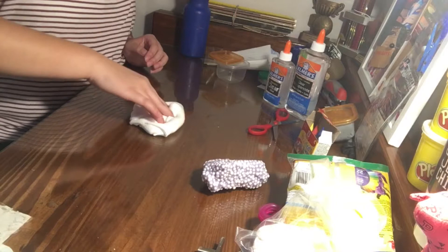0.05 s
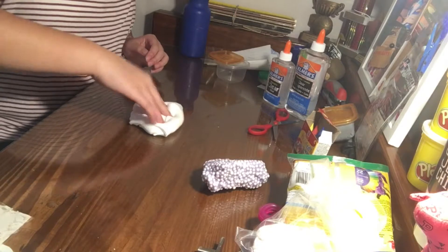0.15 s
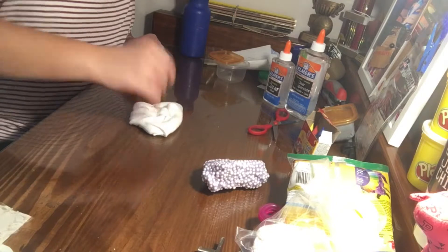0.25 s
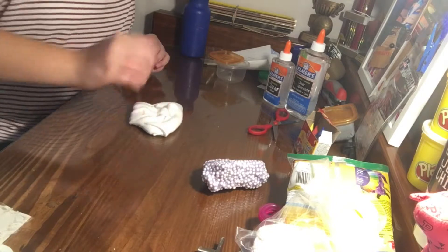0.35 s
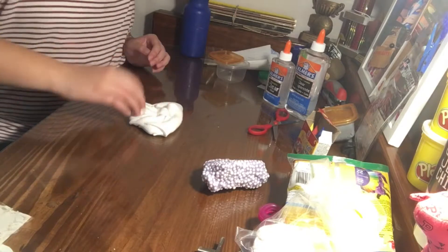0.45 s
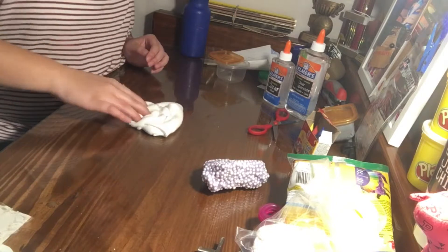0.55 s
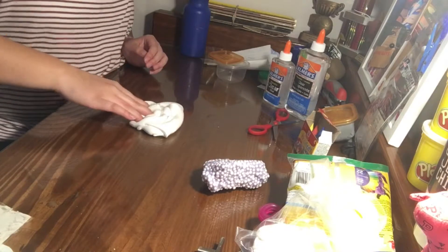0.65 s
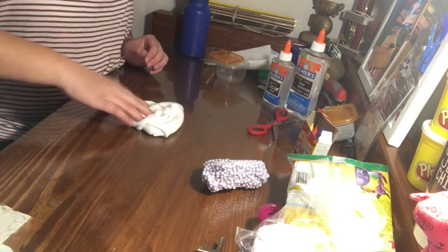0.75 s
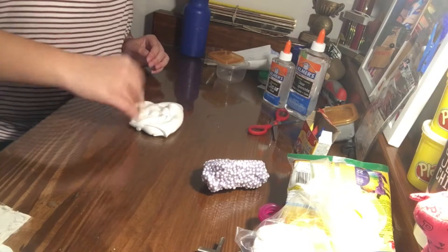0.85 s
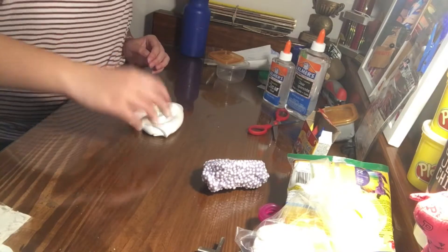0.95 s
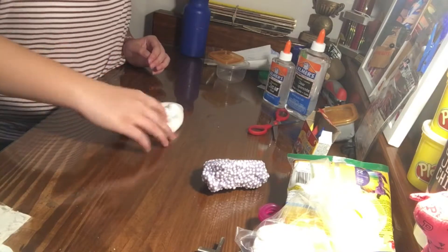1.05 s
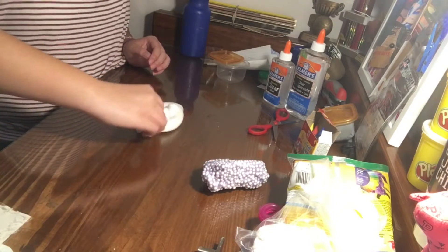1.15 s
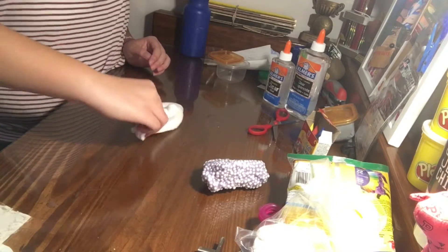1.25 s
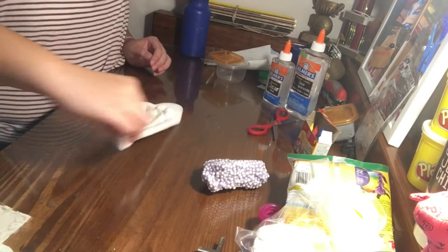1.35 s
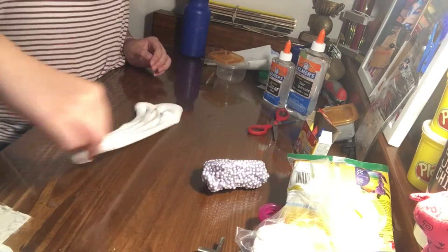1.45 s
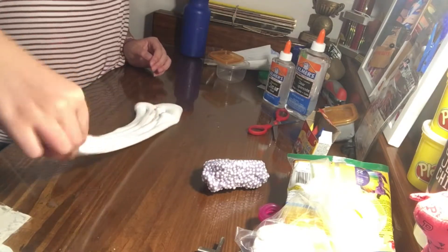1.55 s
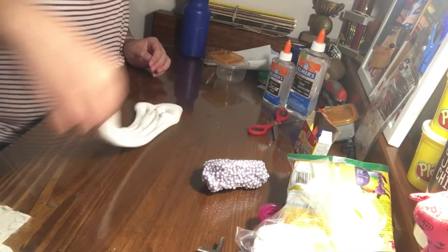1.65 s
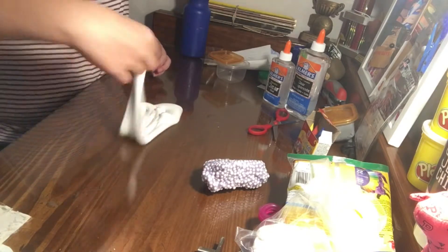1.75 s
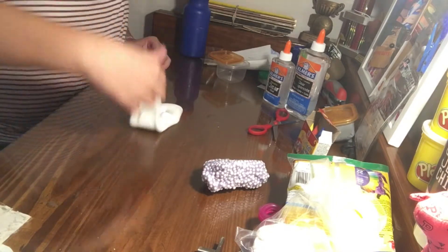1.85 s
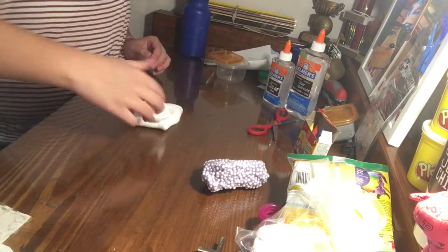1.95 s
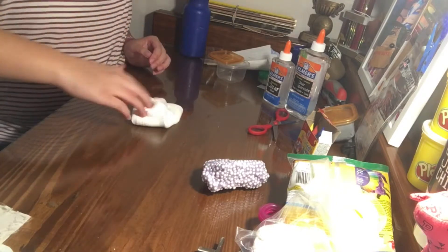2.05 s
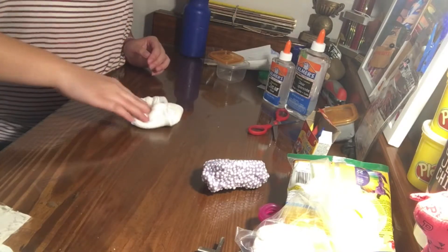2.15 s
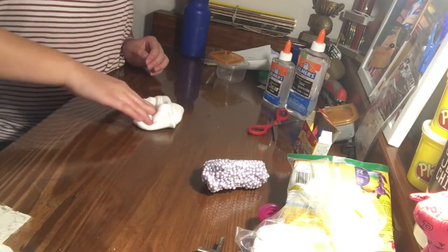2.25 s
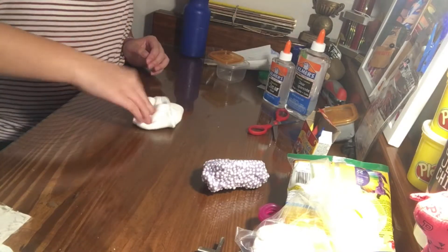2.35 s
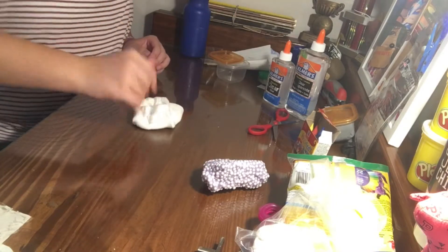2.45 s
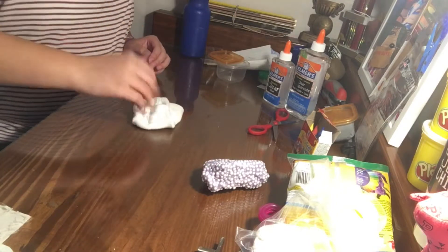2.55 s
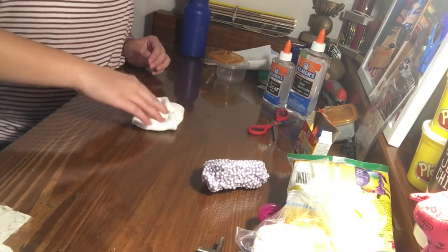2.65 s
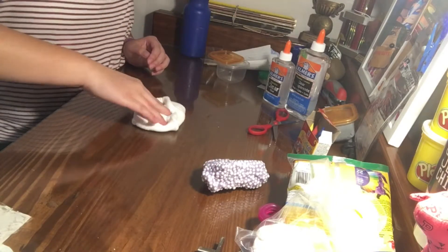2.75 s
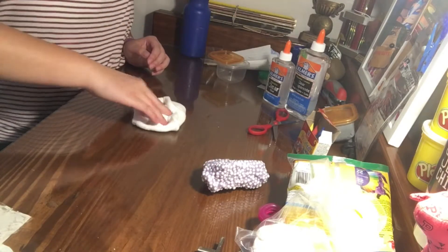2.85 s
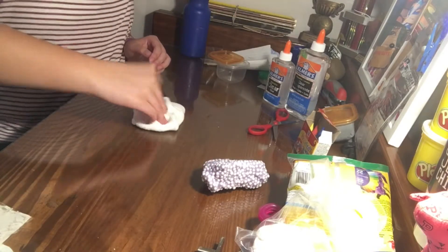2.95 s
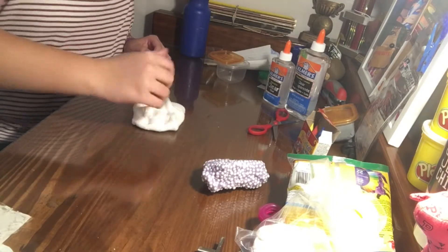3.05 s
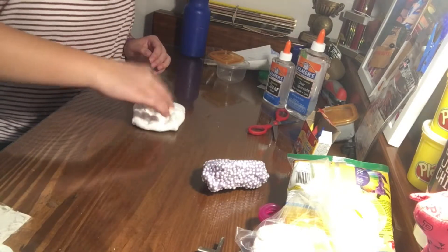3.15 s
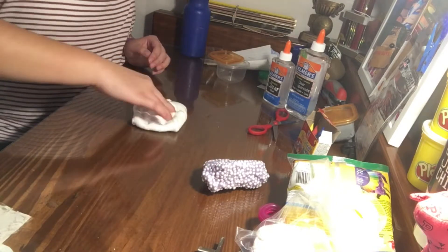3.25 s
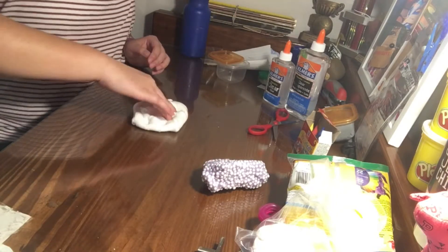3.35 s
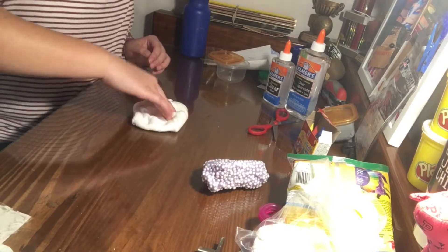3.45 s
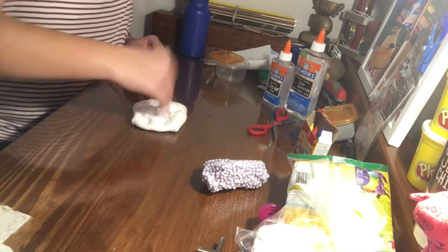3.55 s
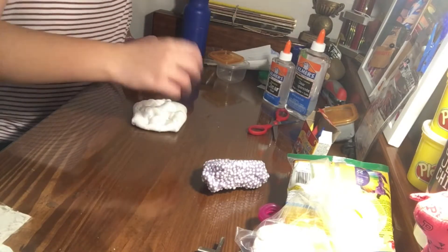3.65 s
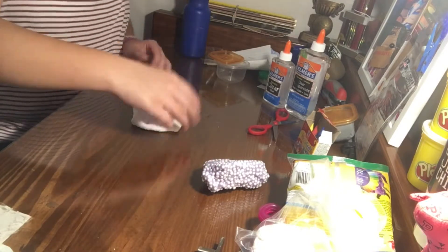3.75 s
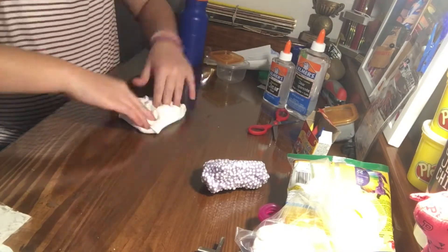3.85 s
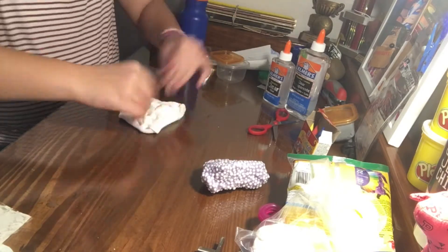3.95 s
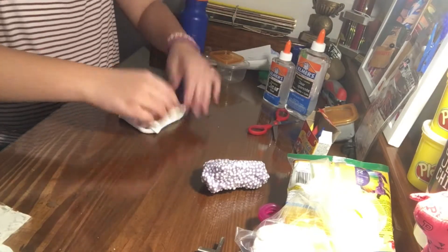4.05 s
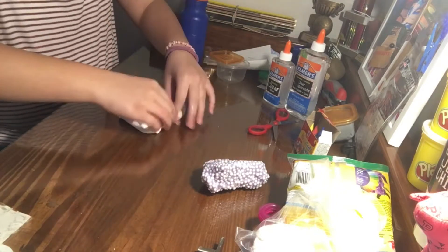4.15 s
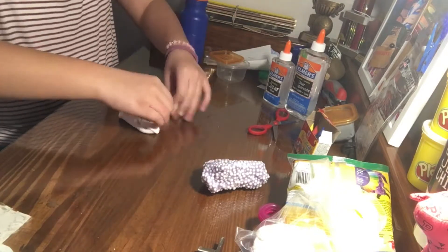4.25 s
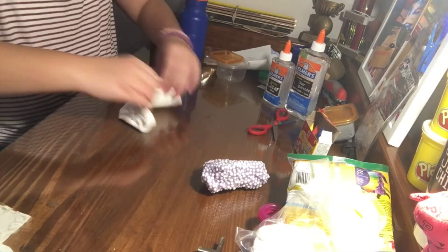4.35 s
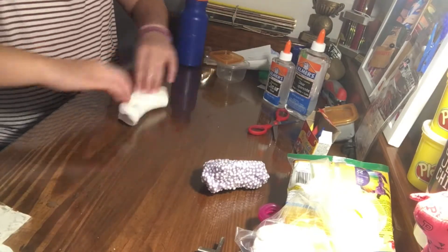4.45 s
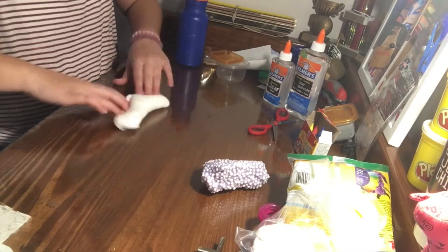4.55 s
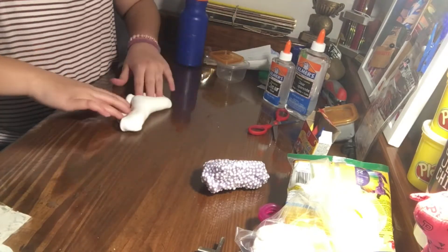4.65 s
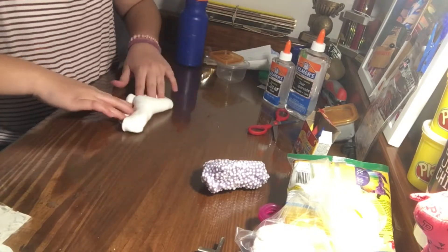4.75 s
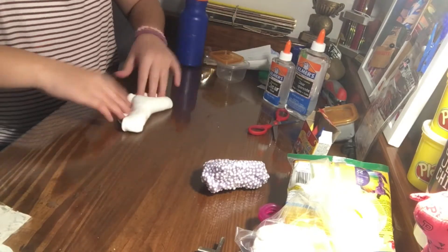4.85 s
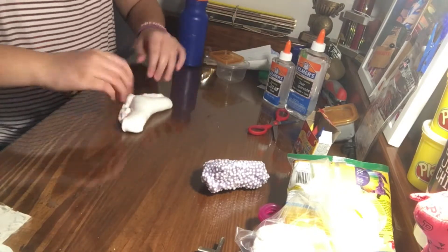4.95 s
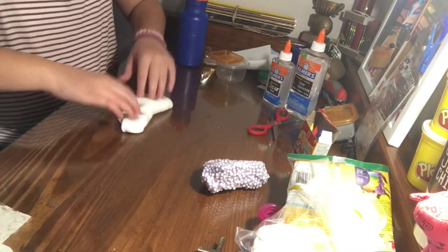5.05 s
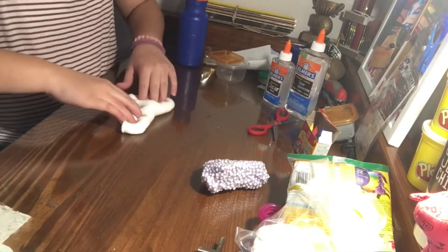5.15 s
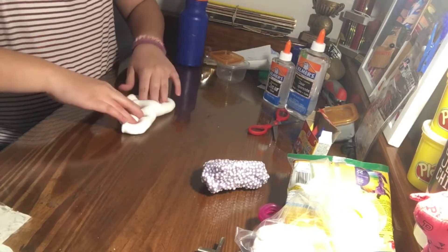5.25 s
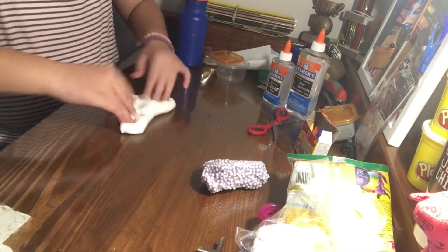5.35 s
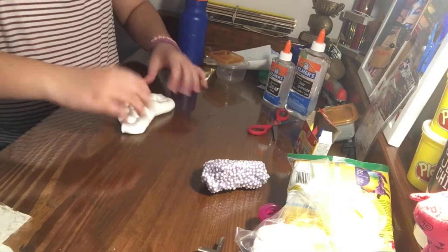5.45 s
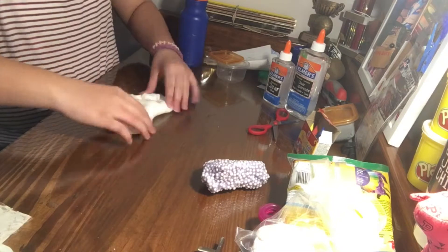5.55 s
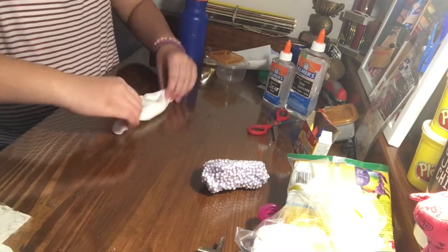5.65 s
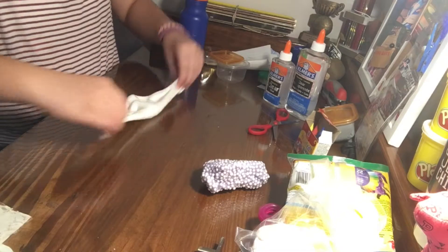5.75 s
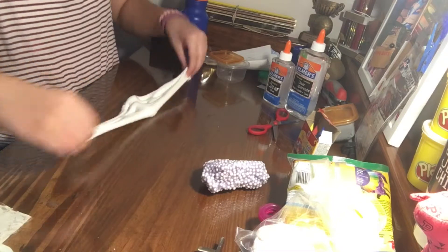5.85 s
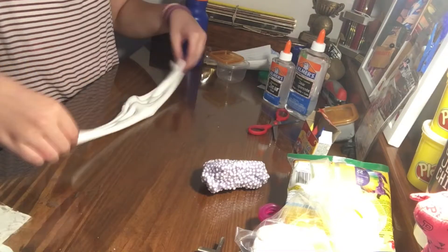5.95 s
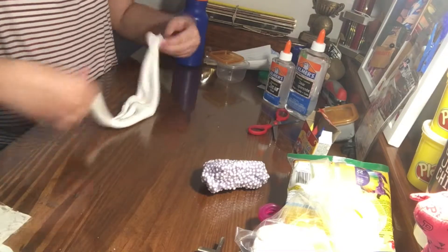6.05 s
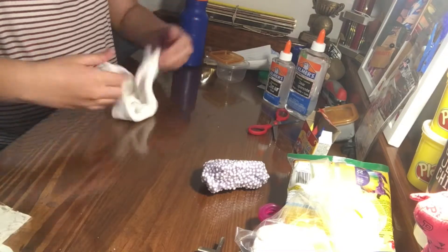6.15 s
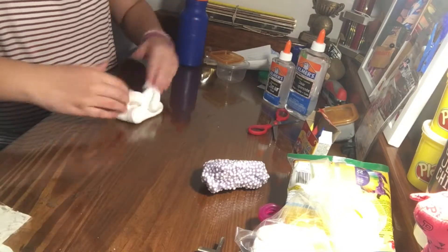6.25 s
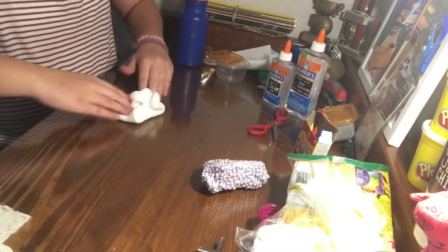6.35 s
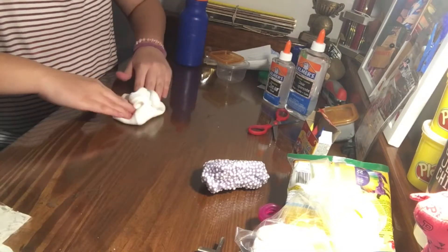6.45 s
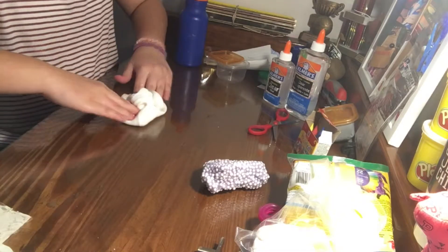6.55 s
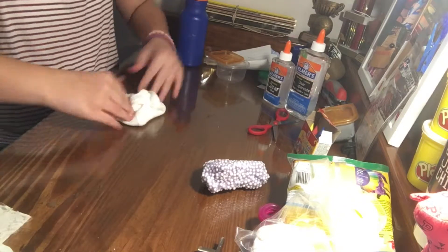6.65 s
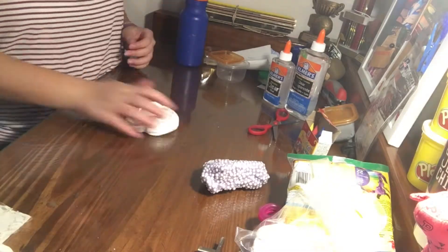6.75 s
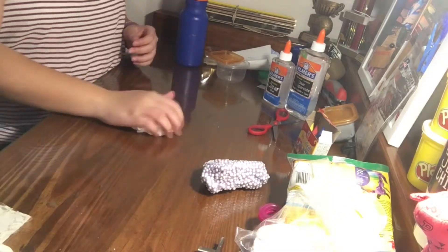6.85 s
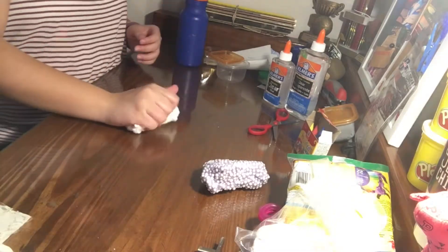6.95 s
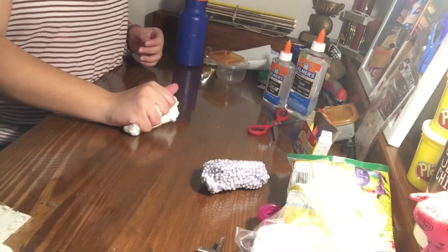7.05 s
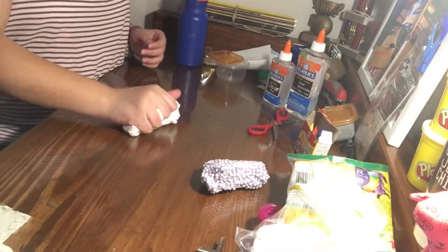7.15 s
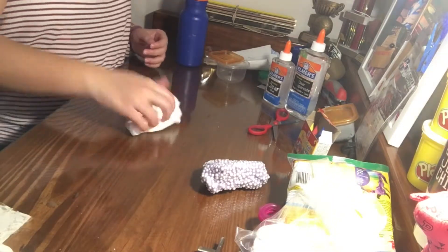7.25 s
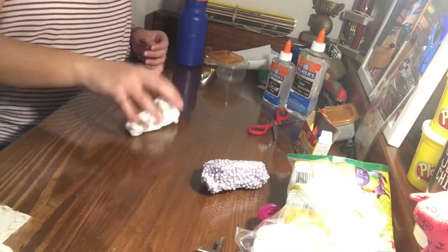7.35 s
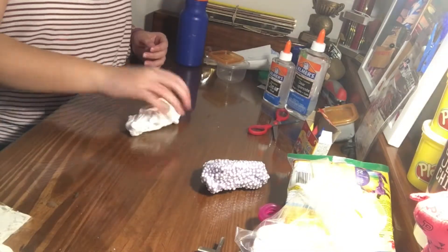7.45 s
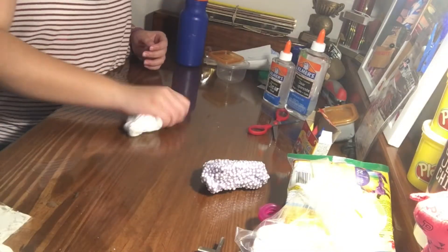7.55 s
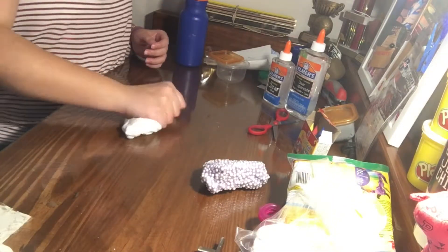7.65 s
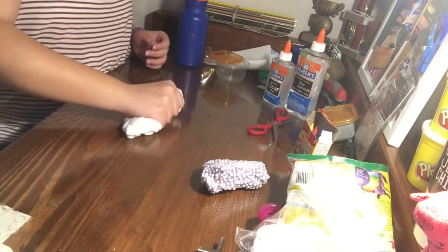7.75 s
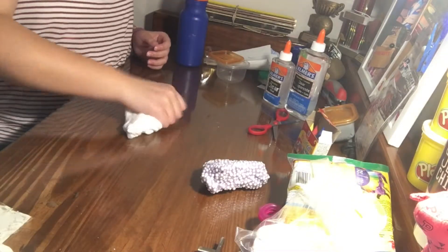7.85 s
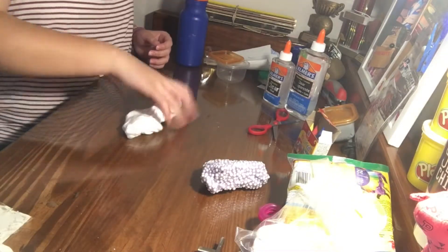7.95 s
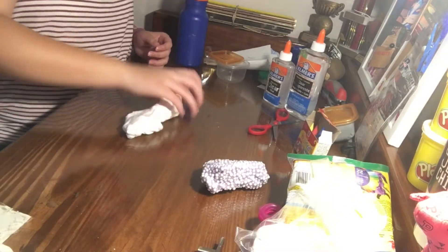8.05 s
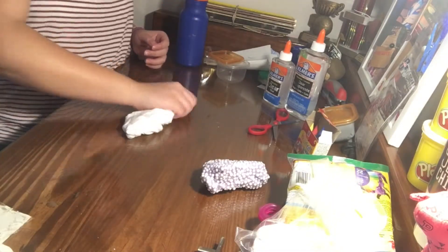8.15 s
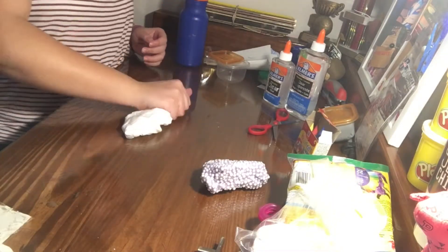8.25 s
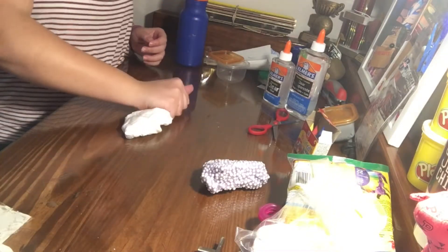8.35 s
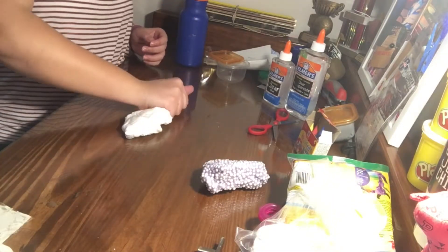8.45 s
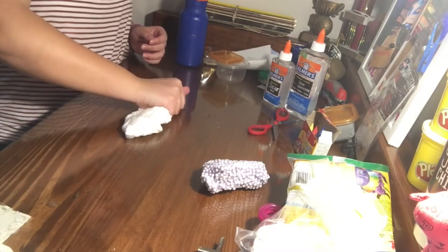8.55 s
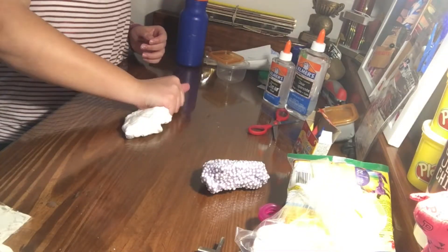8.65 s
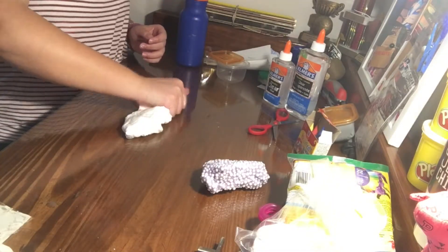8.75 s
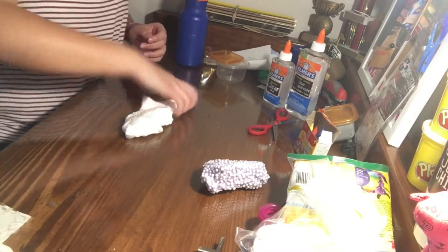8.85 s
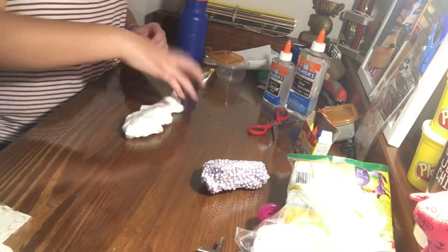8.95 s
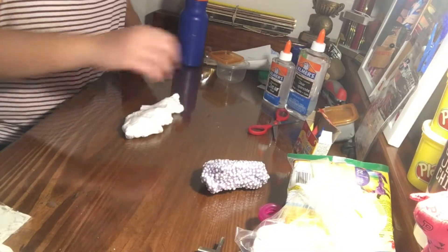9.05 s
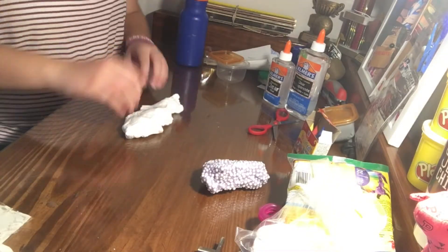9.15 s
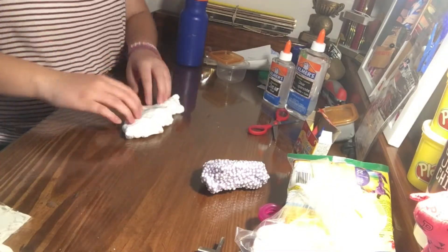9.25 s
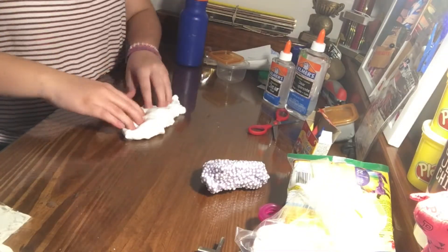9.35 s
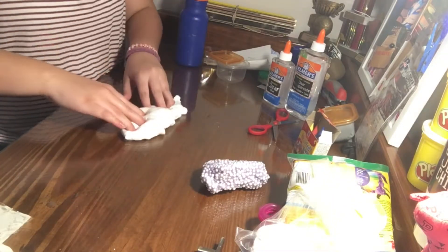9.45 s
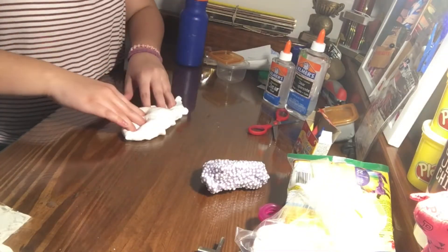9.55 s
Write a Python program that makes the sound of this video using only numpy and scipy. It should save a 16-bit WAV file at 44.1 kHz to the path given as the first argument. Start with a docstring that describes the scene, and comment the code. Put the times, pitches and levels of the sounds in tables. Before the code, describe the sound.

Sticky slime is kneaded on a wooden table close to the microphone. For the first seven seconds, irregular pokes give little groups of hollow pops with torn-film snaps and padded knocks, separated by quiet ticks and skin rustle. Then heavier dragging and hand thumps lead into squeezed bubbles tearing loudly, dense and crackly, distorted at the peaks, before fading to small ticks over quiet room air and slight hum.

```python
"""Wet snaps with a short hollow ring and a soft knock: a hand pokes, folds and kneads sticky slime on a table.
Each poke pops pockets of air: sagging sine rings, torn-film noise and the struck modes of the wooden table.
Between pokes come sticky ticks, dragging rustle, hand knocks and, early on, a low flutter of filtered noise.
Then the fist squeezes the folded lump and trapped bubbles burst, loud enough to overload the microphone.
The slime rings out in a small room, over quiet air and a faint appliance hum."""
import sys
import numpy as np
from scipy import signal
from scipy.fft import rfft, irfft
from scipy.io import wavfile

SR = 44100
rng = np.random.default_rng(int(sys.argv[2]) if len(sys.argv) > 2 else 0)


def inscribe(sig):
    """Save sig as 16-bit PCM at rate SR to the path in sys.argv[1].

    A 1-D sig is mono; a 2-D sig holds one channel per row.
    Samples are clipped to [-1, 1] before scaling.
    """
    pcm = np.round(np.clip(np.atleast_2d(sig).T, -1, 1) * 32767)
    wavfile.write(sys.argv[1], SR, pcm.astype(np.int16))


N = 422478

# Air pockets opened by the fingers, one or several in a poke. Each row: start in seconds, middle of the
# cavity's pitch sag in Hz, ring level in dB, snap centre in Hz, snap level in dB, sizzle in dB; sizzle
# minus snap level sets the balance inside the snap.
POCKETS = [(0.2244, 920, -15.5, 4850, -19.5, -12), (.2532, 666, -11, 2730, -18, -20),
           (0.2755, 570, -17.5, 5070, -15.5, -23.5), (0.8548, 1077, -10.5, 7300, -24.5, -26),
           (.8754, 930, -13.5, 4700, -20.5, -27.5), (.892, 924, -15, 2530, -13.5, -32),
           (1.9474, 1010, -15.5, 1710, -17.5, -19.5), (2.422, 1307, -12, 1930, -18.5, -29.5),
           (2.4358, 723, -21.5, 9000, -27, -17), (2.464, 740, -20.5, 8100, -17.5, -1),
           (2.9793, 1057, -11.5, 3400, -32, -45), (2.985, 994, -12, 5800, -10.5, -32),
           (3.005, 1404, -8.5, 2240, -32, -20.5), (3.011, 817, -13.5, 3000, -14.5, -16),
           (3.0315, 1390, -15.5, 2300, -20.5, -27), (3.551, 1340, -13, 5030, -15.5, -55),
           (3.5802, 667, -20, 2300, -34, -31), (3.976, 633, -10, 4360, -31, -21),
           (3.987, 905, -13.5, 2430, -14, -40), (4.1657, 1026, -13.5, 4800, -16, -37),
           (4.5234, 940, -23, 2300, -45.5, -59), (4.722, 1202, -23.5, 5000, -25.5, -46.5),
           (4.919, 1004, -9.5, 4740, -17, -37), (4.931, 877, -12, 2600, -13.5, -21),
           (5.391, 1485, -17.5, 3530, -15, -23), (5.4152, 670, -13, 2320, -16, -15),
           (5.4276, 980, -10.5, 2325, -40, -43), (6.6783, 957, -20, 6140, -21, -47),
           (6.6947, 866, -15, 2300, -26, -27), (6.7175, 1015, -11, 2700, -18.5, -30),
           (7.016, 980, -12.5, 3220, -19, -23)]


def amp(db):
    """Decibels to gain."""
    return 10 ** (np.asarray(db) / 20)


def evened(x):
    """Scales to rms 1."""
    return x / np.sqrt(np.mean(x ** 2) + 1e-20)


def sized(x, db):
    """Gives a transient the energy of a 3 ms pulse whose rms is at this level."""
    pulse_s = 0.003
    return amp(db) * x * np.sqrt(pulse_s * SR / (np.sum(x ** 2) + 1e-20))


def read(points, hz):
    """Reads a spectrum on a log-frequency axis."""
    f, value = np.transpose(points)
    return np.interp(np.log(hz + 1), np.log(f + 1), value)


def curve(points):
    """Reads a control curve at every sample."""
    return np.interp(np.arange(N) / SR, *np.transpose(points))


def coloured(x, points):
    """Gives a long signal a spectrum, at rms 1."""
    gain = amp(read(points, np.fft.rfftfreq(N, 1 / SR)))
    return evened(irfft(rfft(x) * gain, N))


def cut(x, hz, kind, order=2):
    """Causal low-pass or high-pass."""
    sos = signal.butter(order, min(hz, .45 * SR), kind, fs=SR, output="sos")
    return signal.sosfilt(sos, x)


def add(mix, s, sound):
    """Adds a sound to the mix at time s."""
    part = mix[round(s * SR):][:len(sound)]
    part += sound[:len(part)]


def swells(rows, rise, fall):
    """Gain of a run of gestures: each one rises, holds and dies away; overlaps add in power."""
    t = np.arange(N) / SR
    power = np.zeros(N)
    for s, held, db in rows:
        before, after = np.minimum(t - s, 0), np.maximum(t - s - held, 0)
        power += (amp(db) * np.exp(before / rise - after / fall)) ** 2
    return np.sqrt(power)


def background():
    """Steady filtered noise for room air, a sine for the appliance hum, and a low flutter of swelling noise."""
    # The quiet room. Each row: frequency in Hz, relative level in dB per Hz.
    air_colour = [(20, -18), (45, -1), (70, -8.5), (110, -11.5), (170, -15.5), (260, -19), (400, -23),
                  (800, -25.5), (1600, -27), (2500, -30.5), (4000, -33), (6300, -34), (10000, -45.5),
                  (16000, -38.5)]
    # Appliance hum. Each row: time in seconds, rms level in dB.
    hum_level = [(0, -64), (4.4, -63), (5, -55), (6.6, -59), (9.58, -60.5)]
    # Low flutter while the lump is first kneaded. Each row: start in seconds, held time in seconds, level in dB.
    flutters = [(.43, 0.097, -33), (.6, 0.12, -36.5), (.74, 0.072, -49), (1.14, .12, -46)]
    air_db, hum_hz = -52, 109
    air = amp(air_db) * coloured(rng.standard_normal(N), air_colour)
    hum = amp(curve(hum_level)) * np.sqrt(2) * np.sin(2 * np.pi * hum_hz * np.arange(N) / SR)
    flutter_colour = [(20, 3.0), (45, 5.0), (110, -3.5), (190, -11.5), (350, -27.5), (2000, -73.0)]
    flutter = coloured(rng.standard_normal(N), flutter_colour)
    return air + hum + flutter * swells(flutters, rise=0.0205, fall=0.088)


def stroke_effort():
    """Gain of the hand's strokes: each builds up, holds and dies away."""
    # Skin and slime dragging over the wood. Each row: start in seconds, held time in seconds, level in dB.
    strokes = [(.44, 0.088, -54.5), (.62, 0.061, -53), (1.22, 0.1, -54.5), (1.8, 0.048, -56.5),
               (3.77, .06, -58.5), (4.34, 0.26, -59), (5.65, 0.064, -49), (6.14, 0.064, -67),
               (6.94, 0.41, -47.5), (7.26, 0.047, -38.5), (7.4, 0.12, -50.5), (7.6, 0.15, -48),
               (7.91, 0.075, -38.5), (8.16, 0.59, -48.5), (8.85, 0.051, -37), (9.48, 0.024, -52.5)]
    grip_s, let_go_s = 0.036, 0.041
    return swells(strokes, grip_s, let_go_s)


def drag(effort):
    """Sticky friction: a fine rustle with scattered larger crackles, following the hand's stroke."""
    # Friction spectrum. Each row: frequency in Hz, relative level in dB per Hz.
    drag_colour = [(59, -22.5), (100, 12.5), (193, -8.5), (373, 0), (471, -9), (950, -1.5), (1760, -10),
                   (3050, -6.5), (6840, -15.5), (10500, -26), (16000, -21)]
    grains_per_s, resting_db = 450, -70  # the resting hand still rustles
    struck_now = rng.random(N) < grains_per_s / SR
    grain_gain = amp(5.5 * np.minimum(rng.exponential(1, N), 3))
    grains = struck_now * rng.choice([-1., 1.], N) * grain_gain
    rustle = rng.standard_normal(N) + 1.2 * evened(grains)
    return coloured(rustle, drag_colour) * (effort + amp(resting_db))


def rush(tear, size=2048, count=3):
    """Spectrum of a dying rush of tiny cracks, its energy spread nearly evenly over all frequencies."""
    fade = np.exp(-(np.arange(size) / SR / tear) ** 1.3)
    cracks = np.sign(rng.standard_normal(size)) * fade
    limit = 2 * fade / np.linalg.norm(fade)
    for _ in range(count):  # flatten the spectrum, then hold the fade
        z = rfft(cracks)
        cracks = np.clip(irfft(z / (abs(z) + 1e-12)), -limit, limit)
    return rfft(cracks)


def snap(hz, tear, q, broad_db, sizzle_db, low_hz=1100, high_hz=6800, sizzle_hz=12000):
    """A film of slime tears: a resonant body, a broad crack around it and sizzle on top, both re the body."""
    z = rush(tear)
    f = 1j * np.linspace(1, SR / 2, len(z))
    body = z / (1 + q * (f / hz + hz / f)) ** 2
    broad = rush(tear) * (f / (f + low_hz)) / (1 + 1.74 * f / high_hz + (f / high_hz) ** 2) ** 2
    sizzle = rush(tear) / (1 + 0.45 * (f / sizzle_hz + sizzle_hz / f)) ** 2
    return sized(irfft(body), 0) + sized(irfft(broad), broad_db) + sized(irfft(sizzle), sizzle_db)


def tick(hz, db, body_db=-9):
    """A tiny strand parts from the skin or the wood, with a little hollow body."""
    top = sized(snap(hz, 0.0029, q=1.6, broad_db=-2.5, sizzle_db=-41.5), db)
    hollow = snap(1000, 0.00095, q=0.61, broad_db=-19, sizzle_db=-38.0)
    return top + sized(hollow, db + body_db)


def ticks(effort):
    """Ticks as the skin lets go, as the fingertip starts each poke, and faintly by chance as the hand works."""
    # Skin letting go. Each row: start in seconds, centre in Hz, level in dB of the tick's top.
    strands = [(.0421, 2700, -42), (0.0865, 3100, -36.5), (.686, 4420, -35.5), (1.0986, 3910, -25),
               (1.2553, 5800, -39), (1.3193, 6000, -39), (1.3482, 5440, -38.5), (2.2405, 2980, -34),
               (2.776, 3050, -41.5), (2.7934, 2950, -33.5), (2.9474, 2500, -42.5), (3.335, 2670, -41.5),
               (3.4003, 4000, -37), (3.779, 4560, -40.5), (3.963, 5000, -28.5), (4.419, 9600, -44.5),
               (4.449, 1784, -40.5), (5.1589, 946, -36), (5.2101, 3300, -31), (5.379, 1614, -34),
               (5.596, 3780, -33), (5.614, 2200, -35.5), (5.6697, 3750, -42.5), (6.295, 2920, -38),
               (6.479, 2980, -37.5), (6.4963, 2960, -30), (6.8893, 3000, -27.5), (6.972, 2356, -36),
               (7.2484, 1870, -27), (7.5751, 2830, -29.5), (7.908, 1390, -28), (7.9652, 3010, -29),
               (8.1055, 3275, -33.5), (8.1427, 3000, -24.5), (8.151, 1300, -22.5), (8.2015, 2910, -29),
               (8.2632, 4320, -28.5), (8.2773, 6700, -28.5), (8.964, 1200, -33), (9.4857, 3620, -32.5)]
    poke_gap_s = .1  # a longer pause between pops means a new poke
    touch_lead_s, touch_hz, touch_db = 0.011, 1690, -27  # level re the ring of the poke's first pop
    faint_per_s, faint_hz = 3.1, 3000  # pitch strays up to an octave either way
    faint_db, faint_over_drag_db = -59, 4  # louder during a stroke
    out, pockets = np.zeros(N), np.array(POCKETS)
    for s, hz, db in strands:
        add(out, s, tick(hz, db))
    starts_poke = np.diff(pockets[:, 0], prepend=0) > poke_gap_s
    for s, _, ring_db, *_ in pockets[starts_poke]:
        add(out, s - touch_lead_s, tick(touch_hz, ring_db + touch_db))
    chances = rng.random((120, 3))
    for when, pitch, size in chances[:round(faint_per_s * N / SR)]:
        gain = amp(faint_db) + amp(faint_over_drag_db) * effort[int(when * N)]
        faint = tick(faint_hz * 2 ** (2 * pitch - 1), 0)
        add(out, when * N / SR, 2 * size * gain * faint)
    return out


def cavity(hz, t60, sag=0.11, upper=1.53, upper_db=-12, lower=0.737, lower_db=-11):
    """The air in a finger hole rings for a few cycles, sagging in pitch as the soft walls give."""
    t = np.arange(4096) / SR
    sagging_hz = hz * (1 + sag * (2 * np.exp(-t / 0.0027) - 1))  # from hz * (1 + sag) to hz * (1 - sag)
    turns = np.cumsum(sagging_hz) / SR
    partials = [(1, 0), (upper, upper_db), (lower, lower_db)]
    ring = sum(amp(db) * np.sin(2 * np.pi * ratio * turns) for ratio, db in partials)
    return ring * amp(-60 * t / t60) * (1 - np.exp(-t / 0.0011))


def table_modes():
    """Frequencies of the table and the dying ring of each mode, as complex rows."""
    # Modes of the wooden table. Each row: frequency in Hz, relative level in dB, t60 in seconds.
    wood = [(46.5, -12.5, .4), (62.7, -13.5, 0.31), (82.5, -9, 0.18), (129.3, -7.5, 0.41),
            (136.5, 0.5, 0.23), (164.4, -5.5, 0.27), (211.7, -5.5, 0.21), (252.4, -4, .2), (278, -4, 0.11),
            (347, 2, 0.13), (383.7, -1.5, 0.21), (438, -12.5, 0.12), (557, -0.5, 0.27), (638, -0.5, 0.27),
            (772, -5, 0.097)]
    t = np.arange(SR // 3) / SR
    hz, db, t60 = np.transpose(wood)[:, :, None]
    onset = 1 - np.exp(-t / 0.0024)
    return hz[:, 0], amp(db - 60 * t / t60) * np.exp(2j * np.pi * hz * t) * onset


def struck(rings, weights):
    """Sums the modes with these weights, each stirred in a random phase."""
    phases = np.exp(2j * np.pi * rng.random(len(weights)))
    return ((weights * phases) @ rings).real


def pops(smack_db=-6, lead_db=-29, table_db=-18, reach_hz=230):
    """Air seeps out, then the pocket snaps open, rings and smacks, stirring the table modes near its pitch."""
    ring_s, ring_hz, ring_law = 0.018, 1040, 0.97  # t60 at this pitch; lower cavities ring longer by this power
    out = np.zeros(N)
    mode_hz, rings = table_modes()
    for s, hz, ring_db, snap_hz, snap_db, sizzle_db in POCKETS:
        seep = snap(1400, 0.0091, q=0.56, broad_db=-11.5, sizzle_db=-11.5)[::-1]  # reversed: swells into the pop
        ring = cavity(hz, ring_s * (ring_hz / hz) ** ring_law)
        film = snap(snap_hz, .0016, q=2.5, broad_db=1, sizzle_db=sizzle_db - snap_db)
        smack = snap(1.064 * hz, 0.0041, q=0.52, broad_db=-19.0, sizzle_db=-27.0)
        nearness = 1 / (1 + ((mode_hz - hz) / reach_hz) ** 2)
        add(out, s - len(seep) / SR, sized(seep, ring_db + lead_db))
        add(out, s, sized(ring, ring_db))
        add(out, s, sized(film, snap_db))
        add(out, s, sized(smack, ring_db + smack_db))
        add(out, s, amp(ring_db + table_db) * struck(rings, nearness))
    return out


def squelch():
    """The walls of each opened pocket unstick in a few wet grains, each with its own pitch."""
    level_db, spread_db, span_s = -16, 14.5, .028  # loudest grain re the pop's ring, range below it, reach in time
    low_hz, high_hz = 700, 5470
    out = np.zeros(N)
    for s, _, ring_db, *_ in POCKETS:
        for lag, size, pitch in rng.random((3, 3)):
            hz = low_hz * (high_hz / low_hz) ** pitch
            grain = snap(hz, 0.00054, q=1.1, broad_db=-17.5, sizzle_db=-26.5)
            add(out, s + span_s * lag, sized(grain, ring_db + level_db - spread_db * size))
    return out


def knock(modes, db, contact, weight_db, pat_db):
    """A padded blow rings the table under a dull pat; a longer contact stirs the upper modes less."""
    hz, rings = modes
    uneven_db = weight_db * (hz < 100) + rng.normal(0, 1, len(hz))
    weights = amp(uneven_db) / (1 + (hz * contact) ** 2)
    out = sized(struck(rings, weights), db)
    pat = snap(540, 0.018, q=0.4, broad_db=-14.5, sizzle_db=-37.5)
    add(out, 0, sized(pat, db + pat_db))
    return out


def knocks(pat_db=-5, weight_db=-1):
    """The hand lands on the table between pokes, and the finger drives home behind every pop."""
    # The hand landing. Each row: start in seconds, level of the table's ring in dB, contact time in seconds.
    landings = [(1.097, -21.5, 0.003), (3.577, -20.5, 0.0058), (4.169, -16, 0.0035), (5.599, -22, 0.0078),
                (6.891, -19, 0.0038), (7.577, -18, 0.0042), (7.631, -21.5, 0.0034), (7.98, -26, 0.0071),
                (8.143, -13.5, .0032), (8.202, -20, 0.0017), (8.898, -26, 0.0032)]
    thud_db, thud_contact_s, thud_lag_s = -11.5, 0.0017, .003  # level re the pop's ring
    out, modes = np.zeros(N), table_modes()
    for s, db, contact in landings:
        add(out, s, knock(modes, db, contact, weight_db, pat_db))
    for s, _, ring_db, *_ in POCKETS:
        thud = knock(modes, ring_db + thud_db, thud_contact_s, weight_db=1.0, pat_db=-1)
        add(out, s + thud_lag_s, thud)
    return out


def bursts():
    """Squeezed bubbles tear open, the big ones for longer, and trail off in stray crackles."""
    # Bubbles in the fist. Each row: start in seconds, level in dB, centre in Hz, sharpness Q, sizzle in dB re body.
    bubbles = [(7.045, -18, 4500, 1, -1), (7.0572, 4, 3930, 1.54, -27.5), (7.077, -10.5, 4370, 1.2, -18),
               (7.598, -18, 4130, 2, -17), (7.6654, 0, 3200, 1.2, -33), (7.7093, -3, 3800, 0.85, -19),
               (7.7283, -2.5, 4200, 1.2, -13), (7.7413, 5.5, 5780, 3.1, -22.5), (7.7533, -13, 5800, 3, -17),
               (7.7962, -13, 7050, .8, 10), (8.2121, -13, 3050, 2.8, -35.5), (8.2928, -2, 3200, 2, -11.5),
               (8.3069, -6.5, 5700, 2.5, -10), (8.3185, -7, 5500, 1.7, -16), (8.3357, 3.5, 3010, 1.7, -9),
               (8.345, -10, 5600, 1.1, -9.5), (8.366, -10.5, 2800, 1.5, -6.5), (8.379, -14, 7200, 2.3, -2),
               (8.3901, -12.5, 3200, 1.2, -17), (8.4247, -13.5, 3000, 1, -8),
               (8.4612, -11, 2500, 0.81, -15), (8.483, -18, 2430, .7, -5), (8.9, -17, 2900, 1.86, -43.5)]
    tear_s, tear_growth = .0027, .75  # tearing time of a 0 dB bubble; it grows with gain to this power
    crack_db, crack_fall_db = -5.5, -11  # broad crack re body at Q 1, and its change for a tenfold Q
    stray_db, stray_spread_db, stray_span = -22.5, 10, 11  # loudest re the burst, range below, reach in tearing times
    out = np.zeros(N)
    for s, db, hz, q, sizzle_db in bubbles:
        tear = tear_s * amp(db) ** tear_growth
        broad_db = crack_db + crack_fall_db * np.log10(q)
        add(out, s, sized(snap(hz, tear, q, broad_db, sizzle_db), db))
        for lag, size, pitch in rng.random((3, 3)):
            stray = snap(hz * (.8 + .4 * pitch), 0.00054, q, broad_db, sizzle_db)
            level_db = db + stray_db - stray_spread_db * (size + lag) / 2  # later crackles are fainter
            add(out, s + tear * (1.4 + stray_span * lag), sized(stray, level_db))
    return out


def room(x, wet_db=-8.0, shift_hz=1.7, count=3):
    """Near reflections and tails of sparse taps, dying at their own speed in each band, crossfading in a steady
    cycle."""
    # Decay of the room. Each row: frequency in Hz, t60 in seconds.
    room_t60 = [(100, 0.057), (300, 0.4), (800, 0.26), (2000, 0.37), (5000, 0.38), (9000, 0.34),
                (15000, 0.12)]
    # Colour of the tails. Each row: frequency in Hz, relative level in dB.
    room_colour = [(100, 4.5), (500, 4), (1000, 1.5), (3000, 1), (6000, 1), (10000, 0), (15000, 7)]
    # Reflections from the table top and things on it. Each row: delay in seconds, gain.
    echoes = [(.0009, 0.087), (.0021, -.2), (.0037, 0.51), (.0058, -0.33), (.0083, .12), (0.0135, 0.067)]
    taps = rng.choice([-1., 1.], (count, SR // 2)) * (rng.random((count, SR // 2)) < 5000 / SR)
    taps *= np.clip((np.arange(SR // 2) / SR - .003) / 0.012, 0, 1)  # silent for 3 ms, then fading in
    hz, t, z = signal.stft(taps, SR, nperseg=256)
    fade_db = read(room_colour, hz)[:, None] - 60 * t / read(room_t60, hz)[:, None]
    tails = signal.istft(z * amp(fade_db), SR, nperseg=256)[1]
    out = np.zeros(N)
    turn = np.arange(N) / SR * shift_hz * count  # the tails crossfade in a steady cycle
    for k, tail in enumerate(tails):
        share = np.sin(np.pi / 2 * np.minimum((turn + k) % count, 2))
        out += amp(wet_db) * signal.oaconvolve(x * share, tail / np.linalg.norm(tail))[:N]
    for delay, gain in echoes:
        add(out, delay, gain * x)
    return out


def scene():
    """Slime sounds ring out in the room; the hand's knocks and the background come straight to the microphone."""
    effort = stroke_effort()
    slime = pops() + bursts() + squelch() + drag(effort) + ticks(effort)
    mix = slime + room(slime) + knocks() + background()
    return cut(mix, 36, "high", order=5)[None]


def record(dry):
    """Two brief dips in level, overload as hard clipping of the peaks, then the band limit."""
    # Brief dips in level. Each row: start in seconds, depth in dB, recovery time in seconds.
    dips = [(3.909, -21, 0.048), (6.775, -27, 0.099)]
    edge_hz = 15950
    t = np.arange(N) / SR
    dip_db = np.zeros(N)
    for s, depth_db, recovery in dips:
        dip_db += depth_db * (t > s) * np.clip(1 - ((t - s) / recovery) ** 2, 0, 1)
    clipped = np.clip(dry * amp(dip_db), -.9, .9)
    low_pass = signal.firwin(255, edge_hz, window=("kaiser", 8), fs=SR)
    return signal.oaconvolve(clipped, low_pass[None], "same")


dry = scene()
out = record(dry)
inscribe(out)
```